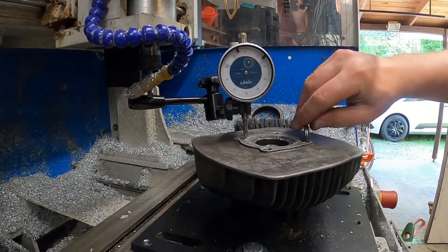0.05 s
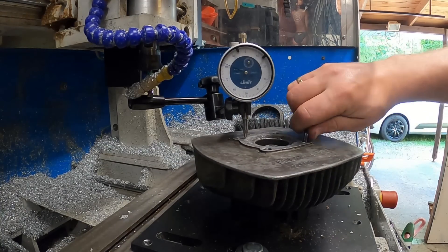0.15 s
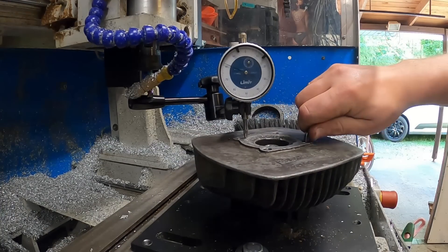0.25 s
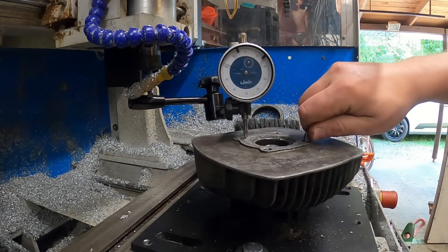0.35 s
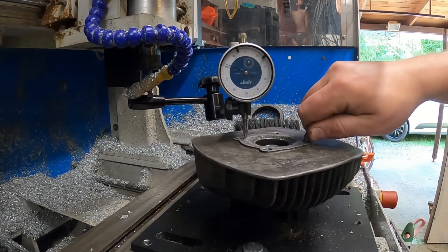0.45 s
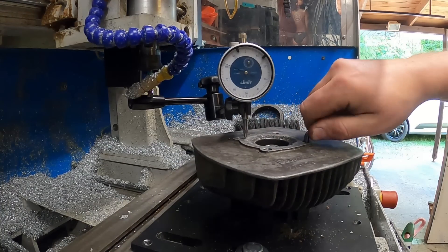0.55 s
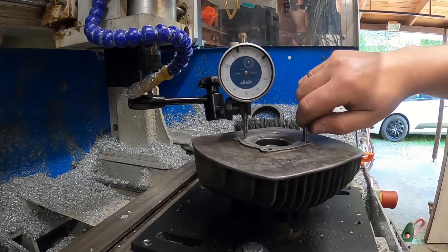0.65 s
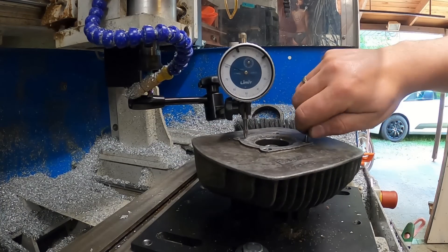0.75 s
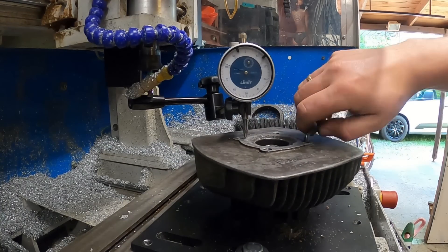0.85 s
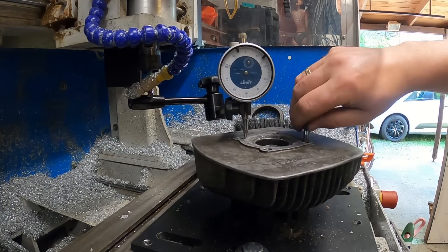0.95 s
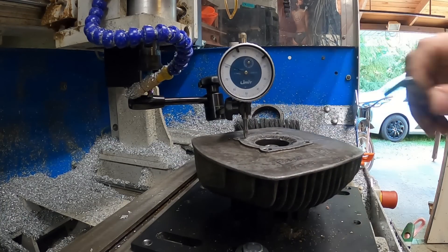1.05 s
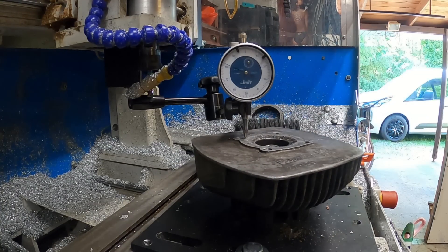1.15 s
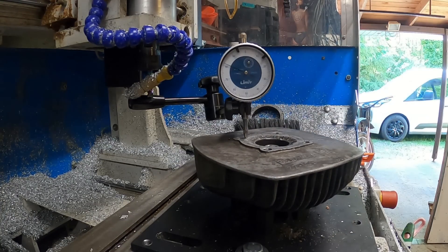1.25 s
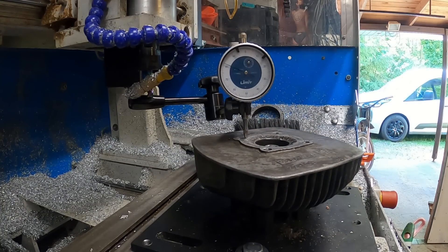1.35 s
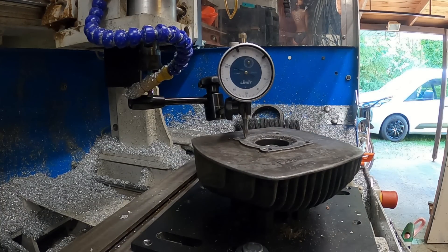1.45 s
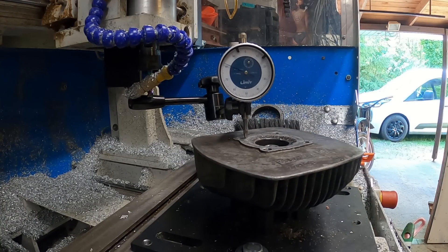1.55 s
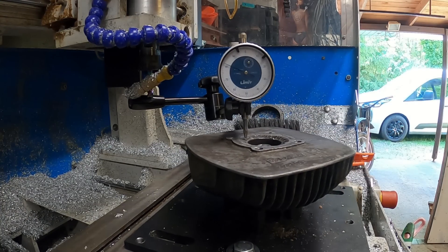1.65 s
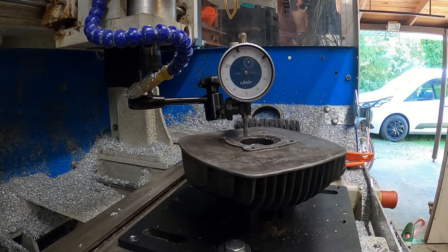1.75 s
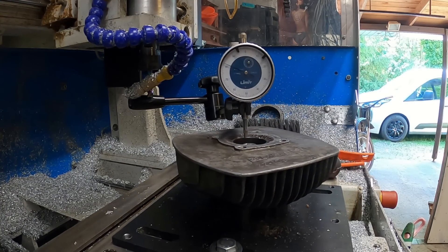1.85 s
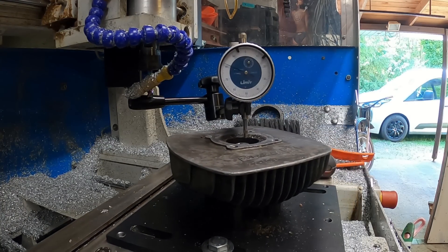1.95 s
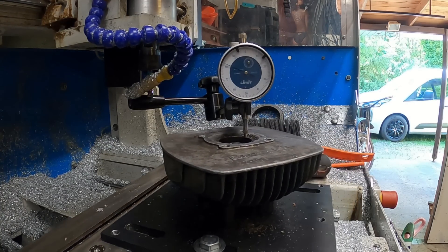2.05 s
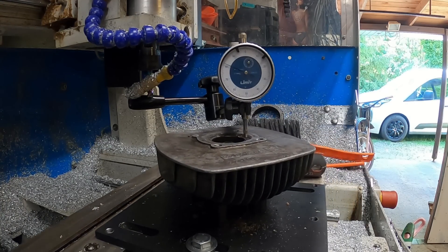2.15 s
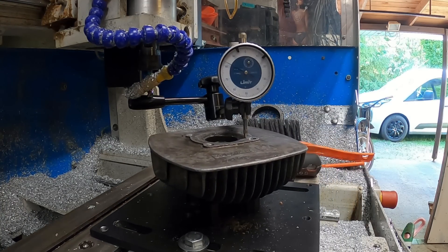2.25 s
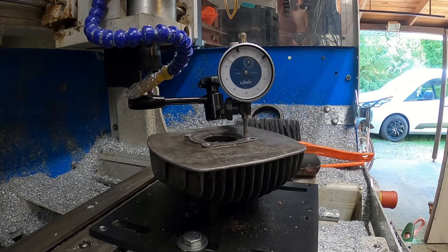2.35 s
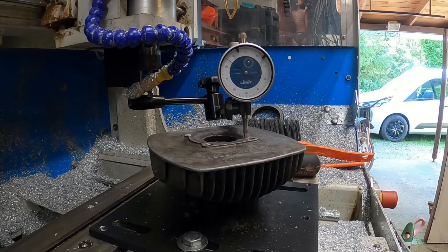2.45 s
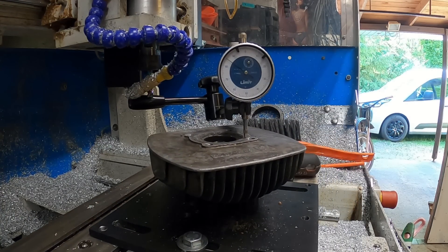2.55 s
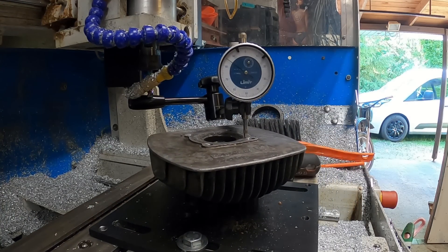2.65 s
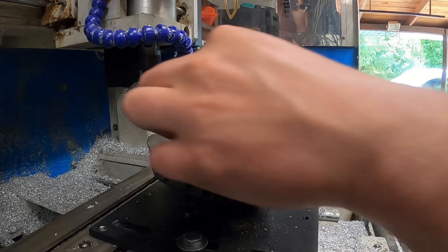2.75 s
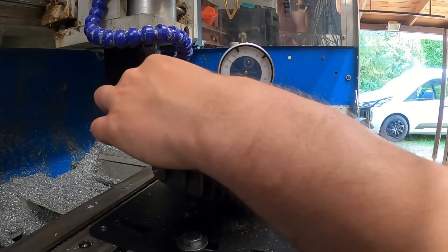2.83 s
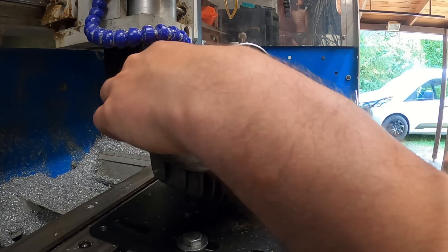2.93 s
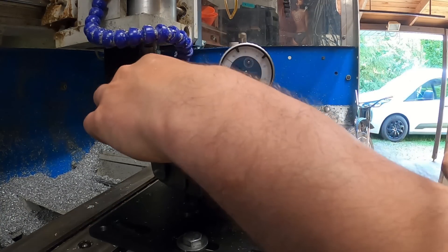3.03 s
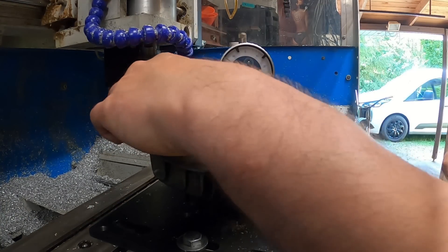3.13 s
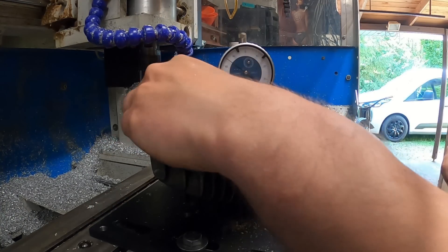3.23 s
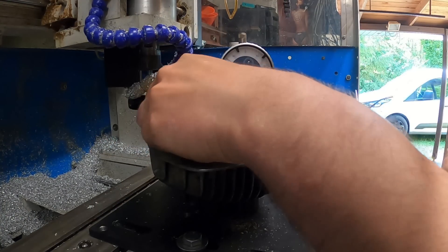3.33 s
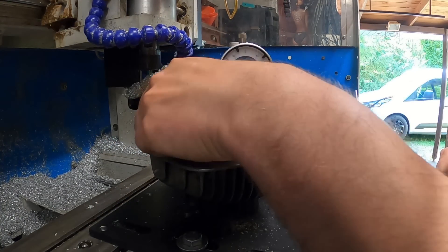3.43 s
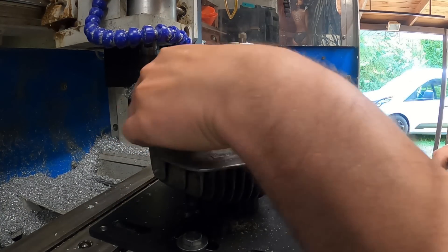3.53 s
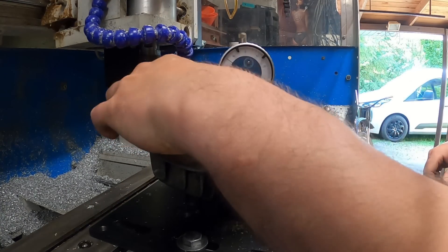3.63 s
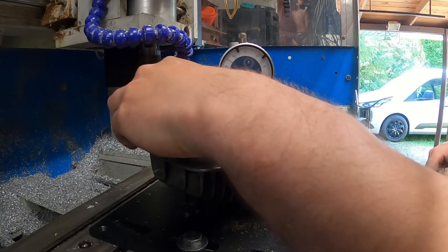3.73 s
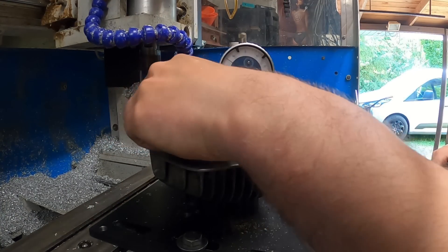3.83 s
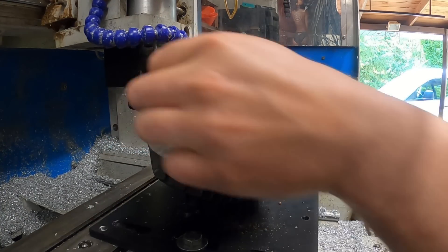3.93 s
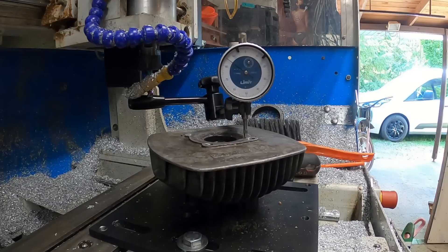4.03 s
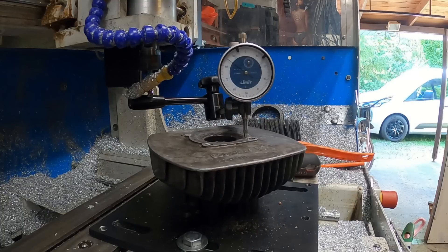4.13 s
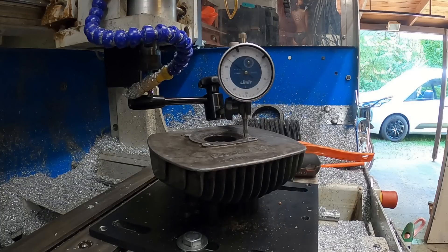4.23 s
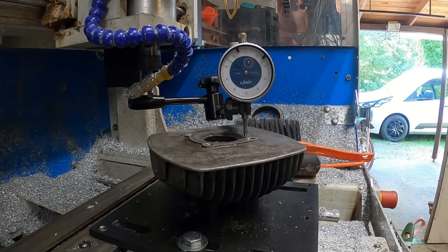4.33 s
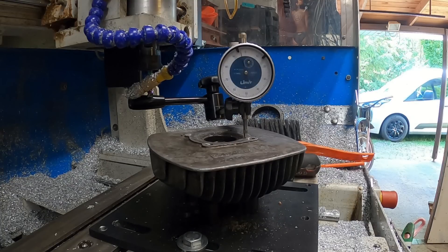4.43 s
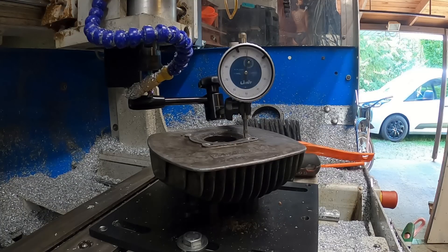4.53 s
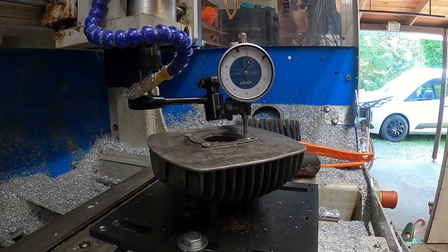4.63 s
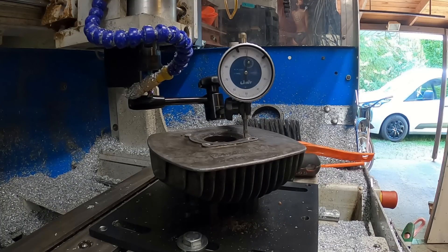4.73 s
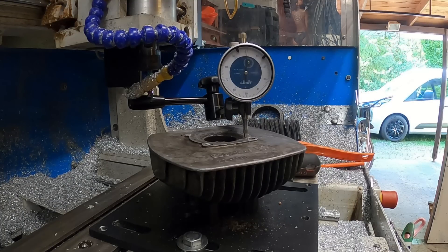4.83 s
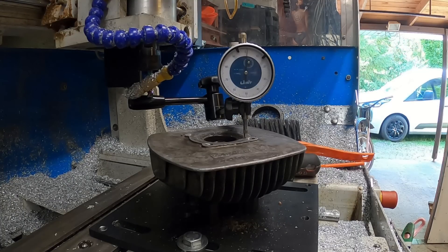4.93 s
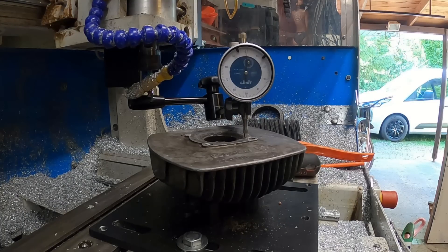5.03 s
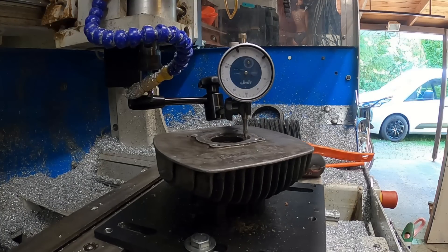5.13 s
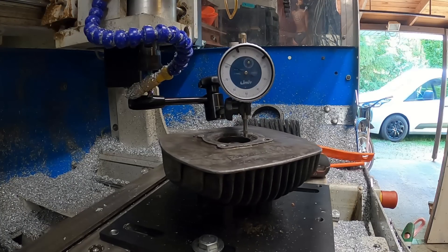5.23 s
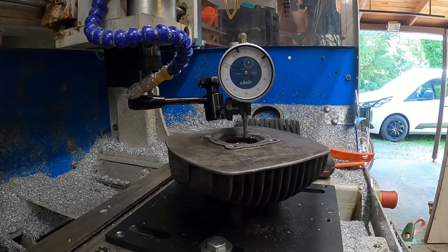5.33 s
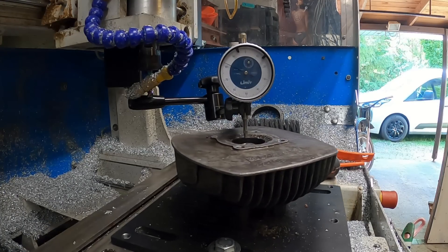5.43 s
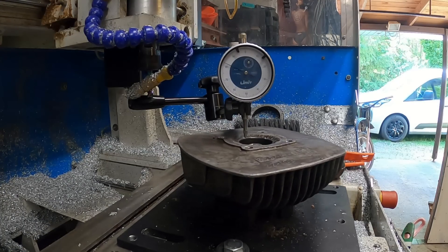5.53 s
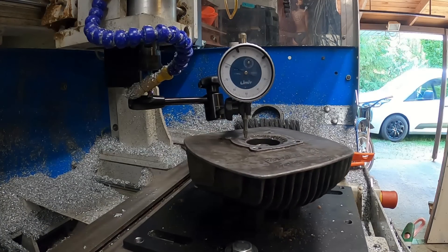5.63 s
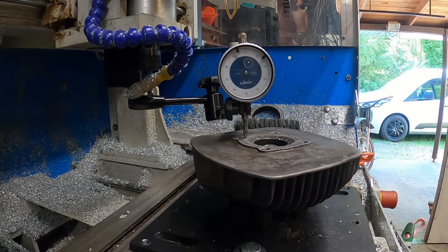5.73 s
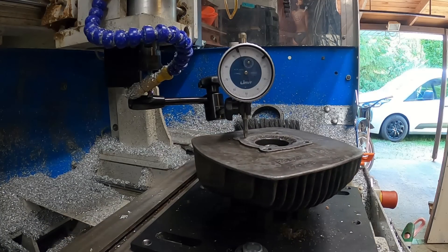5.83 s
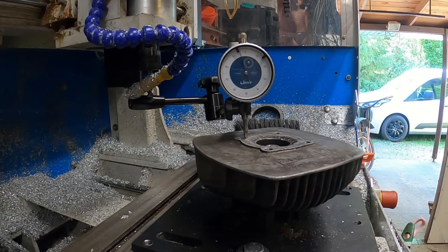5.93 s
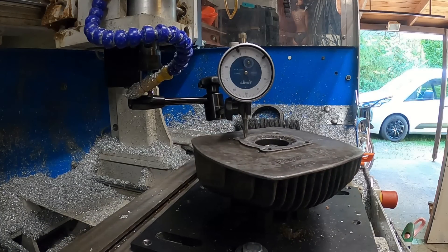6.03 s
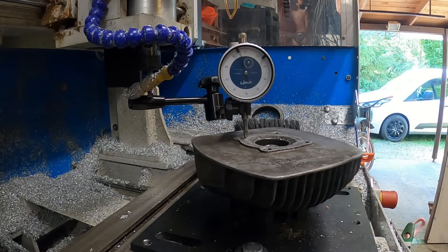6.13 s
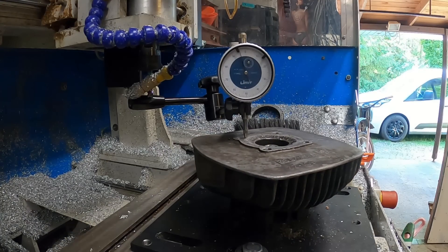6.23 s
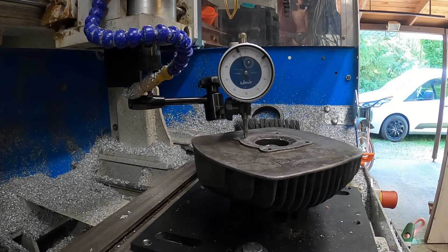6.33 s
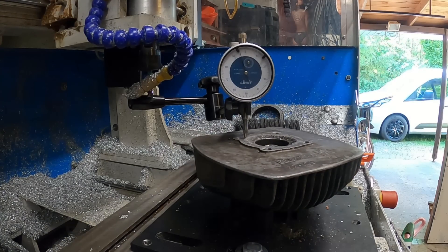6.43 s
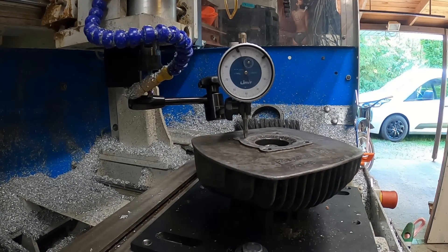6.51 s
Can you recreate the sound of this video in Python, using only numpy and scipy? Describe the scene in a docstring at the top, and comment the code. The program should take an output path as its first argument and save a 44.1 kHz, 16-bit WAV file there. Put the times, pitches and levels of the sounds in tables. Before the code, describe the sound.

In a small workshop, a milling table jogs with harsh wavering motor whines between bright key clinks, dull knocks and three tiny step ticks.

```python
"""Stepper motors jog the table of a small milling machine left and right in abrupt runs: wavering motor tones,
a screw that rings, rattles and squeals going left, and slides that resonate; the cross axis moves in short steps.
A hex key clinks in two clamping bolts of a casting being lined up under a dial gauge, as noise-excited modes.
Filtered noise bursts make rubs, snaps, knocks and scuffs, and faint gliding sines chirp.
Behind them lie shop noise, a hiss that swells and settles, and the thin whine of the motors' holding current."""
import sys
import numpy as np
from scipy import signal
from scipy.fft import rfft, irfft, next_fast_len
from scipy.io import wavfile

SR = 44100
rng = np.random.default_rng(int(sys.argv[2]) if len(sys.argv) > 2 else 0)


def master(y):
    """Save y as 16-bit WAV."""
    cut = np.clip(np.atleast_2d(y).T, -1, 1)
    pcm = np.round(cut * 32767)  # scale
    wavfile.write(sys.argv[1], SR, pcm.astype(np.int16))


N = 289737
TIME = np.arange(N) / SR
HIT_TIME = TIME[:SR // 4]


def amp(db):
    """Level: decibels become an amplitude ratio."""
    return 10 ** (np.asarray(db) / 20)


def rms_one(x):
    """Normalization: scale to unit power."""
    return x / np.sqrt(np.mean(x ** 2) + 1e-20)


def add(out, start, sound):
    """Superposition: mix a short sound in at a given time."""
    first = max(0, round(start * SR))
    out[first:first + len(sound)] += sound[:N - first]


def white(size):
    """White noise: a flat power density of 0 dB per Hz."""
    return rng.standard_normal(size) * np.sqrt(SR / 2)


def noise(spectrum, size=N):
    """Spectral shaping: noise whose level per Hz is interpolated along log frequency."""
    hz, db = np.transpose(spectrum)
    bins = np.maximum(np.fft.rfftfreq(size, 1 / SR), 1)
    gain = amp(np.interp(np.log(bins), np.log(hz), db))
    return irfft(rfft(white(size)) * gain, size)


def drift(rate_hz):
    """Random modulation: low-passed noise with a spread of one."""
    size = next_fast_len(N)
    bins = np.fft.rfftfreq(size, 1 / SR)
    spectrum = rfft(rng.standard_normal(size)) * np.exp(-(bins / rate_hz) ** 2)
    return rms_one(irfft(spectrum, size)[:N])


def resonate(x, hz, width_hz):
    """Resonance: a two-pole filter with about unit gain at its peak."""
    radius = np.exp(-np.pi * width_hz / SR)
    numerator = np.array([1, 0, -1]) * (1 - radius * radius) / 2
    denominator = [1, -2 * radius * np.cos(2 * np.pi * hz / SR), radius * radius]
    return signal.lfilter(numerator, denominator, x + 1e-18)


def lag(x, seconds):
    """Inertia: a first-order response with the given time constant."""
    pole = np.exp(-1 / (seconds * SR))
    return signal.lfilter([1 - pole], [1, -pole], x + 1e-18)


def tone(hz):
    """Phase integration: a sine of unit power that follows a pitch curve."""
    return np.sqrt(2) * np.sin(2 * np.pi * (np.cumsum(hz) / SR + rng.random()))


def burst(spectrum, decay_s):
    """Impact noise: the dense early ringing of a blow as coloured noise that dies away exponentially."""
    return rms_one(noise(spectrum, size=len(HIT_TIME))) * np.exp(-HIT_TIME / decay_s)


def hump(hz, octaves, skirt_db=31):
    """Broad resonance: a spectrum with one rounded peak."""
    grid = np.geomspace(20, 20000, 80)
    distance = np.log2(grid / hz) / octaves
    return np.column_stack([grid, -skirt_db * np.log10(1 + distance ** 2)])


def switched(rows):
    """Gating: the drive is on, at its row's level, between each start and stop."""
    drive = np.zeros(N)
    for start, stop, db, *_ in rows:
        opening = np.clip((TIME - start) * SR, 0, 1)
        closing = np.clip((stop - TIME) * SR, 0, 1)
        drive += amp(db) * opening * closing
    return drive


# balls rolling in the screw, a relative spectrum: pitch_hz [Hz], level_db [dB per Hz]
ROLLING_SPECTRUM = [(150, -104), (230, -100), (330, -67.5), (600, -70), (1300, -74), (1480, -77.5),
                    (1750, -77), (2400, -70), (3000, -78), (4900, -84), (6200, -82), (8200, -86),
                    (12000, -86.5), (15000, -85.5)]


def slide(on, modes, rolling_db, rattle_db):
    """Forced vibration: balls rattle through the screw and shake the slide's modes; the heavy frame follows late."""
    rattle = amp(rattle_db * drift(156))
    rolling = amp(rolling_db) * noise(ROLLING_SPECTRUM) * rattle
    low = signal.sosfiltfilt(signal.butter(2, 1500, fs=SR, output="sos"), rolling)
    force = white(N) * on * rattle
    ringing = np.zeros(N)
    for k, (hz, width_hz, db) in enumerate(modes):
        ringing += (-1) ** k * amp(db) * resonate(force, hz, width_hz)  # signs alternate
    # the low part starts and stops more slowly than the high part
    shaken = low * lag(on, 0.0094) + (rolling - low) * lag(on, 0.0013) + ringing
    return signal.sosfilt(signal.butter(3, 190, "high", fs=SR, output="sos"), shaken)


# runs of the long axis: start_s [s], stop_s [s], level_db [relative dB], direction [0 left, 1 right]
LONG_RUNS = [(1.616, 2.35, -1.98, 0), (5.102, 5.842, -1, 1), (5.954, 5.987, -1, 1), (6.033, 6.063, -1, 1)]
# motor tones, most of them near whole multiples of the shaft rate:
# pitch_hz [Hz], left_db, right_db [relative dB]
MOTOR_TONES = [(257, -64, -64), (321.5, -59, -53), (353.4, -56, -57), (385.8, -47, -46.5),
               (418, -46, -44.5), (610.6, -53, -50), (803.3, -39.5, -41), (819.5, -44.5, -41),
               (931, -50, -53), (953, -55, -49), (1142.5, -49, -54), (1627, -62, -46), (1663, -60, -50),
               (2036, -47, -47), (2058, -50, -49)]
# resonances of the long slide: pitch_hz [Hz], width_hz [Hz], level_db [relative dB per Hz]
LONG_SLIDE_MODES = [(436, 37, -77), (817.5, 23.8, -51), (1217, 73, -64), (1718, 167, -66.5),
                    (2031, 61, -59), (2314, 74, -65.5), (5365, 50, -71.5), (5997, 91, -69),
                    (6640, 270, -73.5), (10440, 120, -76.5), (12300, 40, -76.5), (14300, 1000, -81.5)]
SQUEAL_HZ, SQUEAL_DB, SQUEAL_ATTACK_S, SQUEAL_RELEASE_S = 2350.5, -28.5, .011, .006  # dB relative to the run


def long_axis(waver=0.00201, judder=0.00582, flutter_share=0.35, squeal_flutter_db=2.5, squeal_waver_hz=5,
              squeal_wander_hz=3, ring_db=-43, throb_share=0.84, motor_db=-1.0):
    """Tonal excitation: motor tones waver together and judder apart; the screw rings, and squeals going left."""
    left = switched([run for run in LONG_RUNS if round(run[3]) == 0])
    right = switched([run for run in LONG_RUNS if round(run[3]) == 1])
    speed = 1 + waver * drift(20.1)
    motor = np.zeros(N)
    for hz, left_db, right_db in MOTOR_TONES:
        flutter = 0.91 + flutter_share * drift(51)
        # the frame's time constant is eleven cycles, so low tones hang on longest
        swing = lag(amp(left_db) * left + amp(right_db) * right, 11 / hz)
        motor += swing * tone(hz * (speed + judder * drift(155))) * flutter

    pitch = SQUEAL_HZ + squeal_wander_hz * drift(22) + squeal_waver_hz * drift(48)
    grip = np.minimum(lag(left, SQUEAL_ATTACK_S) ** 2, lag(left, SQUEAL_RELEASE_S))
    squeal = tone(pitch) * amp(SQUEAL_DB + squeal_flutter_db * drift(130)) * grip

    # the screw is barely damped: it throbs during a run and rings on after the stop
    screw = tone(7452 + 10 * drift(70)) * lag(left + amp(-2) * right, .026)
    screw = screw * (1.06 + throb_share * drift(24))
    sliding = slide(left + right, LONG_SLIDE_MODES, rolling_db=1.0, rattle_db=0.5)
    return amp(motor_db) * motor + squeal + amp(ring_db) * screw + sliding


# single steps of the cross axis: start_s [s], stop_s [s], level_db [relative dB]
CROSS_STEPS = [(4.418, 4.433, -2.5), (4.481, 4.496, -3), (4.545, 4.558, -1)]
# resonances of the cross slide: pitch_hz [Hz], width_hz [Hz], level_db [relative dB per Hz]
CROSS_SLIDE_MODES = [(246, 250, -72.5), (380, 87, -62.5), (600, 25, -51.5), (823, 31, -56),
                     (1400, 210, -64.5), (5180, 130, -70.5), (7410, 15, -56), (12580, 57, -57.5)]


def cross_axis():
    """Transient excitation: single steps shake the cross slide's own resonances."""
    return slide(switched(CROSS_STEPS), CROSS_SLIDE_MODES, rolling_db=1.5, rattle_db=2.0)


# hex key touching a bolt: start_s [s], level_db [relative dB], casting_thud_db [relative dB]
KEY_TOUCHES = [(0.0168, -39, -56), (.0282, -29.5, -35.5), (.062, -45.5, -42), (0.0997, -61, -38.5),
               (.6433, -40.5, -42.5), (.6734, -29.5, -63), (0.69, -28.5, -40), (0.732, -30, -42),
               (0.759, -39.5, -40), (1.0245, -36, -39), (2.91, -24.5, -42), (2.981, -31, -47),
               (3.0073, -24, -67), (3.079, -24.5, -44), (3.1451, -41, -38), (3.19, -34, -35.5),
               (3.574, -34, -35.5), (3.6241, -35.5, -50), (3.6476, -31, -32), (3.6865, -39, -34.5),
               (3.7277, -22.5, -27), (3.934, -37, -35)]
# modes of the key in the right bolt: pitch_hz [Hz], level_db [relative dB], t60_s [s]
RIGHT_BOLT_MODES = [(1980, -13, .08), (4600, -16, .05), (5330, -14, .05), (5750, -13, .05), (6430, -9, .07),
                    (7000, -13, .05), (8600, -12, .06), (9510, -5, .07), (9900, -9, .05), (10600, -6, .04),
                    (11050, 1.5, .04), (11500, -4, .04), (13500, -9, .03), (14900, -3, .035)]
# modes of the key in the left bolt: pitch_hz [Hz], level_db [relative dB], t60_s [s]
LEFT_BOLT_MODES = [(4480, -1, .07), (5800, -9, .05), (6400, -6, .06), (8300, 0, .09), (8900, -6, .06),
                   (9750, 0, .08), (10700, -4, .04), (11200, -3, .04), (11800, 1, .05), (12250, -3, .08),
                   (13600, -3, .04), (14000, -3, .04), (14380, 1, .05), (15150, -4, .04)]
# colour of the contact itself: pitch_hz [Hz], level_db [relative dB]
CRACK_SPECTRUM = [(40, -19), (600, -38.5), (1000, -43), (3400, -37), (4600, -0.5), (7600, -7), (11000, 0.5),
                  (15500, -17)]
# colour of the casting's thud: pitch_hz [Hz], level_db [relative dB]
THUD_SPECTRUM = [(40, -45), (150, -66), (350, -33), (650, -10), (830, 7.5), (1000, 0.5), (1350, 10.5),
                 (1950, 6), (3000, -9.5), (8000, -5.5)]
# the key bottoms in the socket and jolts the table: start_s [s], level_db [dB]
TABLE_JOLTS = [(.0282, -41), (.6433, -56), (0.689, -41.5), (0.7324, -48.5), (3.578, -58), (3.7278, -36.5)]
# colour of the jolt through the table: pitch_hz [Hz], level_db [relative dB]
JOLT_SPECTRUM = [(25, -6), (100, -7), (200, -3), (400, 0), (900, -3), (3000, -14), (8000, -35)]
CONTACT_S, CONTACT_DOUBLES_DB = 0.0046, 12  # chatter of a touch at -30 dB; it doubles for one this much lighter
SEATED_S, FREE_RING_DB = .15, 14  # until it sits in the first socket the key rings this much more
CHANGES_BOLT_S = 2  # from the right bolt to the left one
JOLT_DECAY_S = 0.0035


def hex_key(crack_db=-3, ring_db=-6, casting_db=-2.0, thud_decay_s=0.011):
    """Modal excitation: contact chatter rings the key, the casting thuds, and bottoming out jolts the table."""
    out = np.zeros(N)
    for start, db, thud_db in KEY_TOUCHES:
        contact_s = CONTACT_S * 2 ** (-(db + 30) / CONTACT_DOUBLES_DB)
        chatter = white(len(HIT_TIME)) * np.exp(-HIT_TIME / contact_s)
        modes = RIGHT_BOLT_MODES if start < CHANGES_BOLT_S else LEFT_BOLT_MODES
        ring = np.zeros(len(HIT_TIME))
        for hz, mode_db, t60 in modes:
            mode = resonate(chatter, hz, np.log(1000) / (np.pi * t60))
            varied_db = mode_db + 2.5 * rng.standard_normal()  # each touch excites the modes differently
            ring += amp(varied_db) * mode / np.abs(mode).max()
        ring = ring / np.std(ring[:SR // 150])
        free_db = FREE_RING_DB * (start < SEATED_S)
        key = amp(crack_db) * burst(CRACK_SPECTRUM, contact_s) + amp(ring_db + free_db) * ring
        thud = amp(thud_db + casting_db) * burst(THUD_SPECTRUM, thud_decay_s)
        add(out, start, amp(db) * key + thud)
    for start, db in TABLE_JOLTS:
        add(out, start, amp(db) * burst(JOLT_SPECTRUM, JOLT_DECAY_S))
    return out


# hard snaps of handling: start_s [s], level_db [dB], pitch_hz [centre Hz]
HARD_SNAPS = [(2.8, -19.5, 4470), (2.8873, -22.5, 3030), (6.4919, -32, 2130)]
# dull knocks: start_s [s], level_db [dB]
DULL_KNOCKS = [(2.655, -38), (2.666, -34), (2.815, -32.5), (2.829, -34.5), (3.288, -47), (6.285, -42),
               (6.301, -34.5), (6.402, -32), (6.476, -39)]
# broad scuffs: start_s [s], level_db [dB]
BROAD_SCUFFS = [(4.1152, -33.5), (4.123, -31.5), (4.164, -36.5), (4.267, -36), (6.249, -32.5), (6.264, -33)]
SNAP_DECAY_S, SNAP_HZ_PER_OCTAVE = 0.0041, 4800  # the higher a snap, the wider its band
KNOCK_HZ, KNOCK_OCTAVES, KNOCK_DECAY_S = 1155, 1, 0.013
# a low panel answers each knock; its level is relative to the knock
THUMP_HZ, THUMP_OCTAVES, THUMP_DB, THUMP_LAG_S, THUMP_DECAY_S = 289, 0.39, -15, 0.0077, 0.021
SCUFF_HZ, SCUFF_OCTAVES, SCUFF_DECAY_S = 2600, 3.8, 0.011


def knocks():
    """Contact stiffness: hard contacts snap short, soft ones knock with a late low thump, glancing ones scuff."""
    out = np.zeros(N)
    for start, db, hz in HARD_SNAPS:
        add(out, start, amp(db) * burst(hump(hz, hz / SNAP_HZ_PER_OCTAVE), SNAP_DECAY_S))
    for start, db in DULL_KNOCKS:
        add(out, start, amp(db) * burst(hump(KNOCK_HZ, KNOCK_OCTAVES), KNOCK_DECAY_S))
        thump = burst(hump(THUMP_HZ, THUMP_OCTAVES), THUMP_DECAY_S)
        add(out, start + THUMP_LAG_S, amp(db + THUMP_DB) * thump)
    for start, db in BROAD_SCUFFS:
        add(out, start, amp(db) * burst(hump(SCUFF_HZ, SCUFF_OCTAVES), SCUFF_DECAY_S))
    return signal.sosfilt(signal.butter(2, 190, "high", fs=SR, output="sos"), out)


# fingers rubbing over the key and the casting:
# start_s [s], length_s [s], dull_db, bright_db [dB at the crest of the swell]
FINGER_RUBS = [(0.144, 0.15, -59, -57), (0.738, 0.26, -55, -53.5), (1.014, 0.024, -44, -53),
               (1.12, .12, -50.5, -62), (3.075, 0.08, -51.5, -43.5), (3.527, 0.2, -61, -49)]


def fingers(grain_db=3):
    """Friction noise: skin catches and slides in a grainy swell, dull from the casting and bright from the key."""
    out = np.zeros(N)
    grain = amp(grain_db * drift(110))
    dull = rms_one(noise(THUD_SPECTRUM) * grain)
    bright = rms_one(noise(CRACK_SPECTRUM) * grain)
    for start, length, dull_db, bright_db in FINGER_RUBS:
        swell = np.sin(np.pi * np.clip((TIME - start) / length, 0, 1))
        out += swell * (amp(dull_db) * dull + amp(bright_db) * bright)
    return out


# thin high chirps: start_s [s], length_s [s], pitch_hz [Hz at the start], level_db [dB at mid-length]
HIGH_CHIRPS = [(0.773, 0.078, 12400, -51), (0.919, 0.032, 13900, -44.5), (0.993, 0.023, 14800, -46),
               (1.08, .012, 15750, -39), (1.106, .045, 14300, -50), (2.5, .04, 13000, -50),
               (2.94, .025, 15900, -42), (3.415, .03, 14900, -48), (5.515, 0.032, 14000, -39)]
CHIRP_FALL_HZ_PER_S = 11300


def chirps():
    """Frequency modulation: faint, slightly rough sines glide down near the top of hearing."""
    out = np.zeros(N)
    rough_hz = 300 * drift(900)
    for start, length, hz, db in HIGH_CHIRPS:
        age = TIME[TIME < length]
        roughness = rough_hz[int(start * SR):][:len(age)]
        pitch = hz - CHIRP_FALL_HZ_PER_S * age + roughness
        add(out, start, amp(db) * tone(pitch) * np.sin(np.pi * age / length))
    return out


def workshop(x, t60=0.089, wet_db=-15, wall_hz=5000):
    """Reverberation: a short, dull, decaying tail from the machine's guards and the walls."""
    decay = np.exp(-np.log(1000) * HIT_TIME / t60)
    tail = rng.standard_normal(len(HIT_TIME)) * decay * (HIT_TIME > .004)
    tail = signal.sosfilt(signal.butter(1, wall_hz, fs=SR, output="sos"), tail)
    return x + amp(wet_db) * signal.fftconvolve(x, tail / np.linalg.norm(tail))[:N]


# colour of the shop noise: pitch_hz [Hz], level_db [relative dB]
SHOP_SPECTRUM = [(30, -14), (110, -41.5), (185, -3.5), (260, 1.5), (560, -3.5), (780, 17), (1050, 9),
                 (1350, 19.5), (1700, 12), (2100, 17), (2800, 8), (4000, 8), (9000, -35)]
# colour of the hiss: pitch_hz [Hz], level_db [relative dB]
HISS_SPECTRUM = [(1000, -19), (2600, -10.5), (3600, -2.5), (6500, 1), (8500, -3), (12000, -2), (15500, -9)]
# colour of the top of the hiss: pitch_hz [Hz], level_db [relative dB]
SIZZLE_SPECTRUM = [(5000, -28), (8500, -6), (12000, -9.5), (15500, -3)]
# holding current in the motors: pitch_hz [Hz], level_db [dB]
IDLE_TONES = [(1000, -67.5), (1498, -73), (1999, -67.5), (2999, -75)]
# the background swells steadily, holds, then settles a little
SWELL_DB_PER_S, SWELL_ENDS_S = 2.5, 4.2
SETTLE_DB, SETTLE_STARTS_S, SETTLE_S = 3, 5, .7
# levels at the top of the swell; the second is dB of murmur per dB of swell
MURMUR_DB, MURMUR_FOLLOWS, HISS_DB, SIZZLE_DB = -49, 1.47, -47.5, -50


def background(sizzle_growth=2.0, boom_db=-82, boom_hz=185):
    """Stationary noise under slow modulation: murmur, uneven boom, a hiss that brightens as it swells, a whine."""
    settling = np.clip((TIME - SETTLE_STARTS_S) / SETTLE_S, 0, 1)
    swell_db = SWELL_DB_PER_S * np.minimum(TIME - SWELL_ENDS_S, 0) - SETTLE_DB * settling
    shop = amp(MURMUR_DB + MURMUR_FOLLOWS * swell_db + 2.9 * drift(21)) * rms_one(noise(SHOP_SPECTRUM))
    hiss = amp(HISS_DB + swell_db + 0.63 * drift(36)) * rms_one(noise(HISS_SPECTRUM))
    sizzle = amp(SIZZLE_DB + sizzle_growth * swell_db) * rms_one(noise(SIZZLE_SPECTRUM))
    boom = rms_one(resonate(resonate(white(N), boom_hz, 35), boom_hz, 35))
    boom = boom * amp(3.5 * drift(9))
    whine = sum(amp(db) * tone(hz + 1.47 * drift(9.2)) for hz, db in IDLE_TONES)
    return shop + hiss + sizzle + amp(boom_db) * boom + whine


def scene():
    """Superposition at one point beside the table: the same sum goes to both channels."""
    near = long_axis() + cross_axis() + hex_key() + knocks() + fingers()
    mono = workshop(near) + chirps() + background()
    return np.array([mono, mono])


CUTOFF_HZ = 15900


def record(dry):
    """Band limiting: an elliptic low-pass cuts the top steeply."""
    return signal.sosfilt(signal.ellip(12, .2, 80, CUTOFF_HZ, fs=SR, output="sos"), dry)


dry = scene()
out = record(dry)
master(out)
```